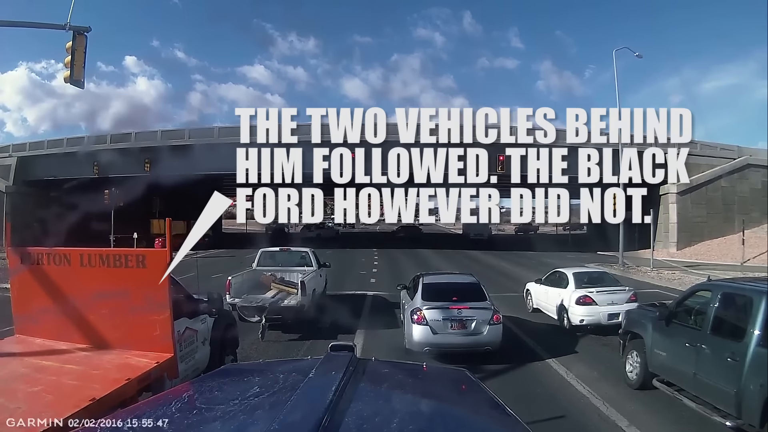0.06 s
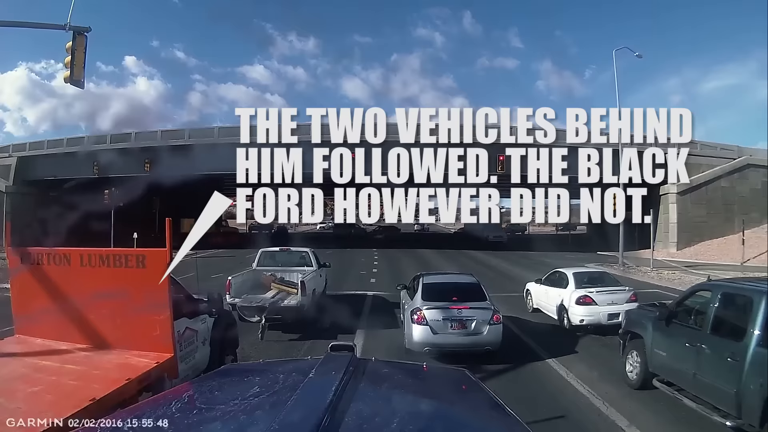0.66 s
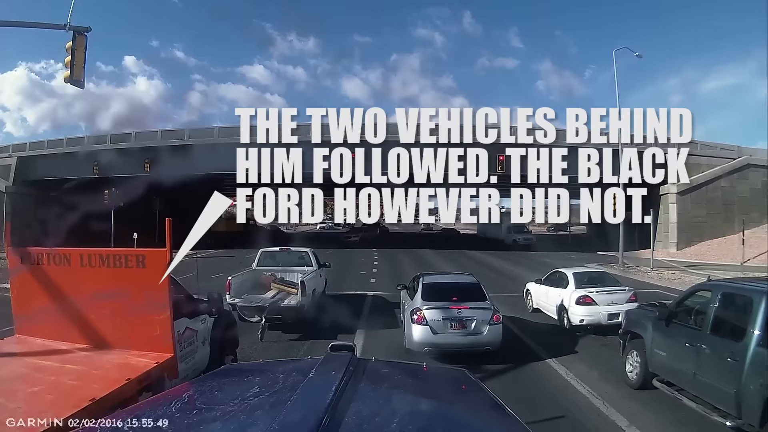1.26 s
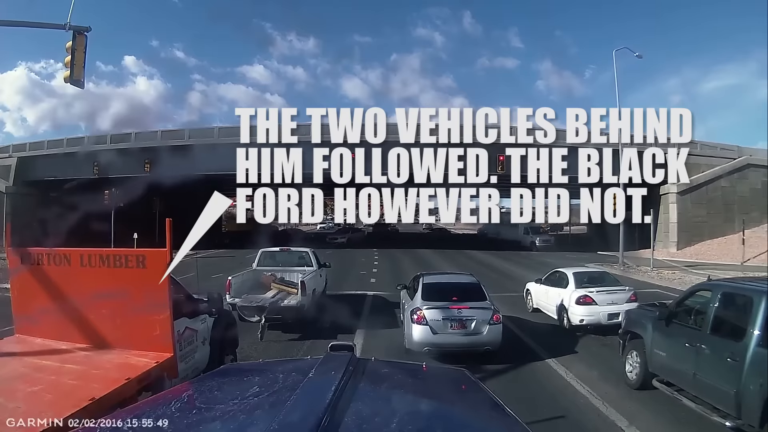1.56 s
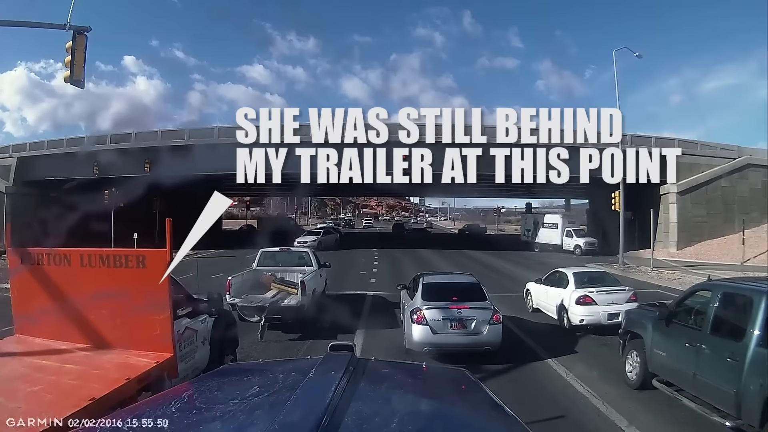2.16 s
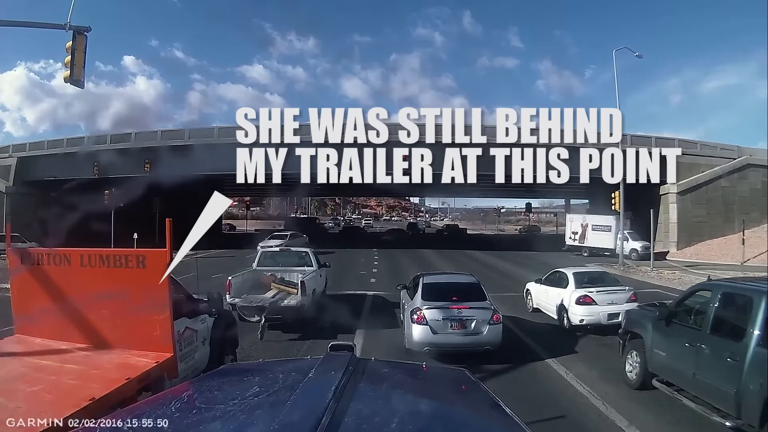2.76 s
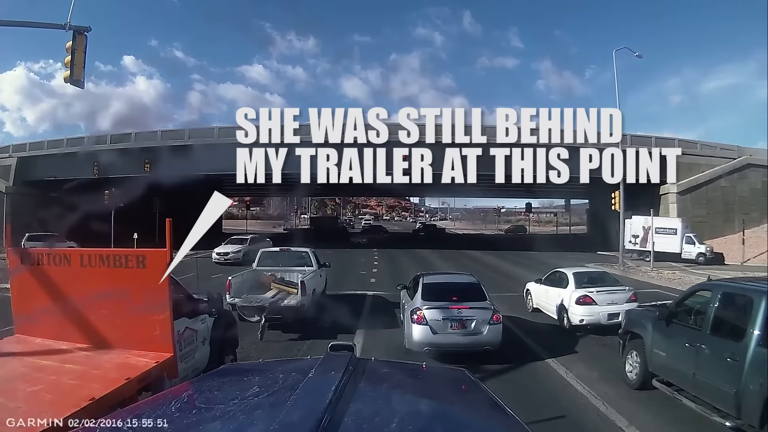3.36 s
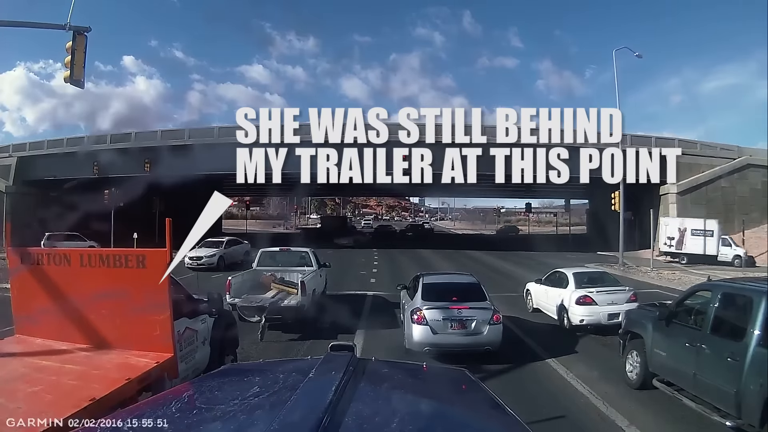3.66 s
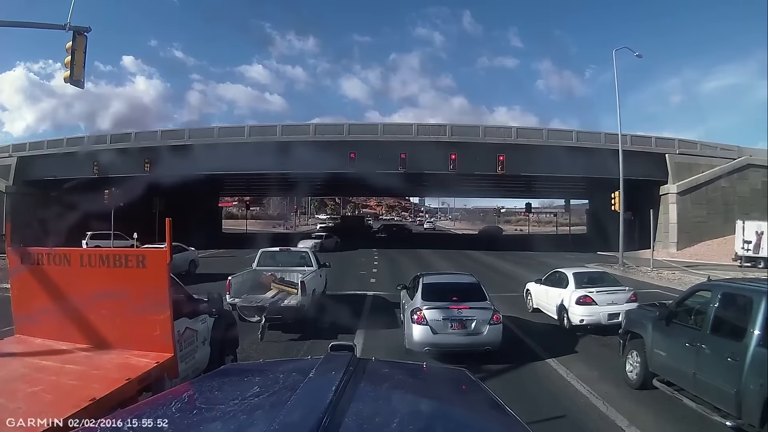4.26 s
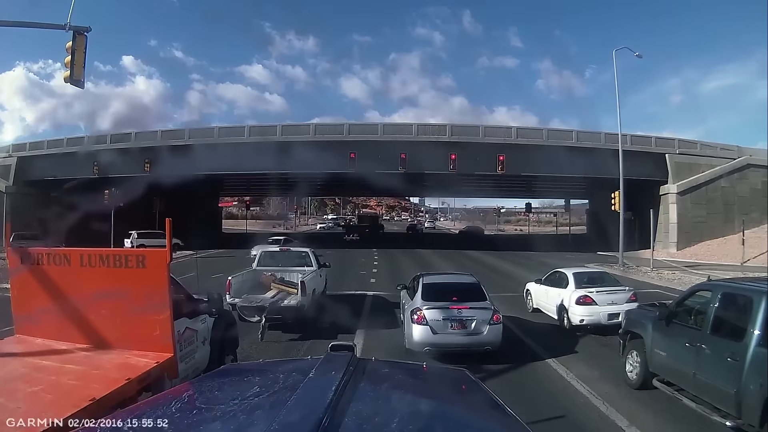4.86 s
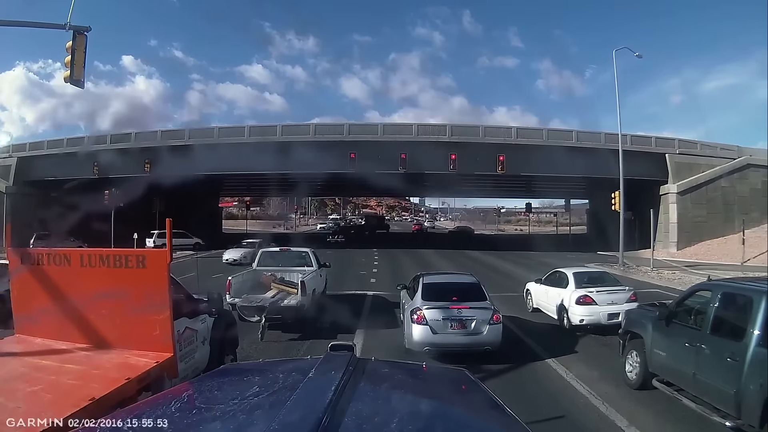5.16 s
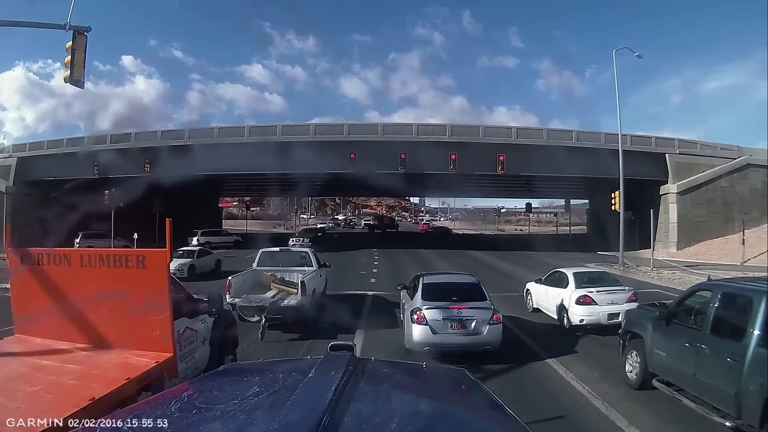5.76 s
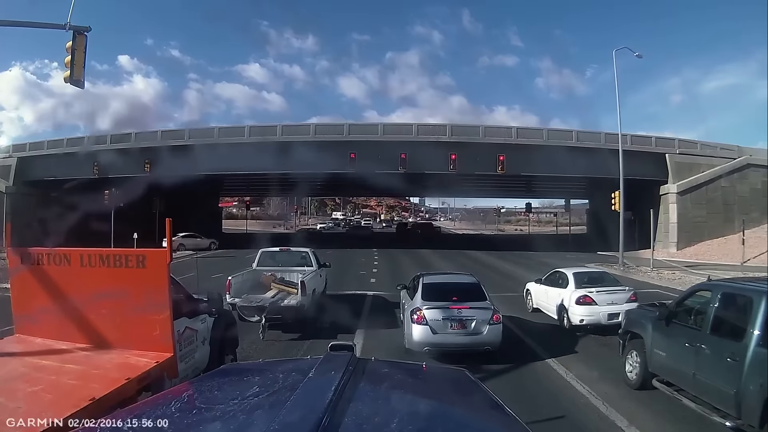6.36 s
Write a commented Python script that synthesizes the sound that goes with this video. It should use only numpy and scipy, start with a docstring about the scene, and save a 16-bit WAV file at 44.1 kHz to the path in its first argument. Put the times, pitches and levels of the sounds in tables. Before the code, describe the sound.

A large diesel truck engine idles from the very start, heard from inside the closed cab. Its deep, fast throb holds a constant speed with a slight lope, and the cab booms softly with it. Engine clatter comes through dulled by the panels, with a soft pulsing, flickering hiss and very faint, brief metallic ticks scattered throughout. At about 0.3 to 0.7 seconds the low boom swells, followed by a weaker swell ending around 1 second. From about 3.5 seconds a faint, wavering mid-pitched hum comes and goes behind the engine. Between roughly 3.8 and 4.8 seconds a few very faint, thin, high tones flicker in short bursts. The idle carries on unchanged until about 6.2 seconds, when all sound cuts out abruptly, leaving near silence for the last moment.

```python
"""Idling diesel truck, heard in the cab

A six-cylinder diesel idles at 700 rpm. Its firings throb through the floor, unequal cylinders make it
lope, and the air of the closed cab booms in resonance. Combustion clatter comes dulled through the
panels, its treble flaring briefly, and soft noise near 3 kHz pulses and flickers. A faint hum and thin
high tones come and go; near the end the sound cuts out."""
import sys
import numpy as np
from scipy import signal
from scipy.fft import rfft, irfft, next_fast_len
from scipy.io import wavfile

SR = 44100
rng = np.random.default_rng(int(sys.argv[2]) if len(sys.argv) > 2 else 0)


def to_wav(s):
    """Save 16-bit WAV."""
    ch = np.atleast_2d(s).T  # columns
    pcm = np.round(np.clip(ch, -1, 1) * 32767)  # PCM
    wavfile.write(sys.argv[1], SR, pcm.astype(np.int16))


N = 287091
T = np.arange(N) / SR
FIRING_HZ, CYLINDERS = 35.003, 6
FLARE_EDGE_S = .008
# treble flares of the clatter: t/s, duration/s, top f/Hz, spectrum level/dB before colouring
FLARES = [(0.231, 0.048, 5100, -100.0), (0.494, 0.041, 5500, -99.0), (0.728, 0.044, 5000, -100.0),
          (0.837, 0.023, 4200, -103.0), (0.899, 0.033, 5000, -102.0), (1.02, 0.029, 4600, -102.0),
          (1.093, 0.022, 4400, -98.0), (1.175, 0.025, 4600, -101.0), (1.262, 0.022, 5700, -103.0),
          (1.432, 0.022, 5100, -103.0), (1.601, 0.016, 3800, -97.0), (1.684, 0.049, 5700, -103.0),
          (1.794, 0.025, 5100, -101.0), (1.841, 0.031, 3800, -96.0), (1.945, 0.09, 5100, -102.0),
          (2.112, 0.018, 3700, -97.0), (2.244, 0.067, 4500, -101.0), (2.327, 0.043, 5600, -102.0),
          (2.458, 0.065, 4900, -101.0), (2.63, 0.02, 5100, -102.0), (2.694, 0.021, 5600, -102.0),
          (2.799, 0.023, 5100, -101.0), (2.969, 0.022, 4600, -100.0), (3.055, 0.019, 4100, -96.0),
          (3.146, 0.039, 5500, -100.0), (3.226, 0.019, 3800, -96.0), (3.311, 0.023, 5100, -102.0),
          (3.653, 0.066, 4600, -99.0), (3.844, 0.046, 5000, -100.0), (4.035, 0.023, 4600, -98.0),
          (4.126, 0.059, 5000, -100.0), (4.228, 0.023, 4600, -99.0), (4.356, 0.017, 5100, -101.0),
          (4.396, 0.028, 3800, -94.0), (4.438, 0.033, 5600, -102.0), (4.524, 0.041, 4500, -98.0),
          (4.738, 0.026, 5500, -100.0), (4.911, 0.023, 5000, -98.0), (5.037, 0.043, 4200, -100.0),
          (5.381, 0.047, 4600, -100.0), (5.546, 0.045, 5100, -100.0), (5.721, 0.023, 5000, -100.0),
          (5.894, 0.02, 5500, -99.0), (6.081, 0.026, 4200, -96.0)]


def crank(first_firing_s, wander):
    """Phase of a governed rotation, counted in firings: the speed is almost constant."""
    return FIRING_HZ * (T - first_firing_s) + wander * drift(0.86)


def throb(firings, flutter_db):
    """Periodic pressure pulses form a harmonic series; the cab's resonant phase lag spreads each pulse."""
    # harmonics: multiple of the firing rate, rms level/dB
    harmonics = [(1, -25.4), (2, -25.7), (3, -33.8), (4, -36.2), (5, -44.3), (6, -58), (7, -63), (11, -58),
                 (12, -58), (14, -61), (15, -59.5), (18, -68)]
    # air modes of the cab: f/Hz, bandwidth/Hz
    air_modes = [(82, 11.5), (134, 6)]
    out = 0
    for k, db in harmonics:
        hz = k * FIRING_HZ
        lag = sum(2 * np.arctan2(width * hz, centre ** 2 - hz ** 2) for centre, width in air_modes)
        out += from_db(db) * np.cos(2 * np.pi * k * firings - lag)
    return np.sqrt(2) * out * from_db(flutter_db * drift(4.7))


def lope(firings, odd_place=-.17, smear_firings=.07):
    """Half-order vibration: one odd cylinder jolts the block on its mounts every second crank turn."""
    # harmonics: multiple of the four-stroke cycle rate, rms level/dB
    harmonics = [(2, -39), (3, -41), (4, -45), (7, -34), (8, -48), (9, -38), (10, -50), (13, -47),
                 (15, -45.5), (19, -43), (20, -45.5), (21, -47), (22, -53), (26, -54), (27, -54), (29, -52),
                 (31, -55), (32, -55), (33, -56), (45, -57)]
    cycles = (firings - odd_place) / CYLINDERS
    out = 0
    for k, db in harmonics:
        smear = rng.normal(0, smear_firings) / CYLINDERS
        out += from_db(db) * np.cos(2 * np.pi * k * (cycles + smear))
    return np.sqrt(2) * out


def boom(firings, pump):
    """Forced resonance: random shaking, swelling with each firing, drives the air of the cab."""
    # boom of the cab air: f/Hz, spectrum level/dB
    spectrum = [(7, -78), (18, -58), (29, -61), (44, -56), (53, -49.5), (62, -47), (73, -51.5),
                (100, -54.5), (130, -56.5), (185, -60), (215, -67), (245, -80), (400, -90)]
    shake = rng.standard_normal(N) * (1 + pump * np.cos(2 * np.pi * firings))
    return coloured(rms_one(shake), spectrum)


def swells(waver_hz):
    """The cab air swells into a deep tone that rises and dies under a half-sine envelope."""
    # deep booms: t/s, duration/s, f/Hz, peak level/dB
    booms = [(0.336, 0.33, 62.7, -20.5), (0.69, 0.31, 59, -27)]
    out = 0
    for start, length, hz, db in booms:
        envelope = np.sin(np.pi * np.clip((T - start) / length, 0, 1))
        phase = 2 * np.pi * np.cumsum(hz + waver_hz * drift(7.5)) / SR
        out += from_db(db) * envelope * np.sin(phase)
    return out


def knocks(firings, cylinder_db, alike, decay_s, steady, rise_s=0.0051):
    """Impulsive excitation: each firing adds an exponentially damped burst to a steady noise."""
    number = np.floor(firings).astype(int) + CYLINDERS
    age_s = firings % 1 / FIRING_HZ
    scatter_db = 1.5 * rng.standard_normal(number.max() + 1)   # no two burns are quite equal
    strength = from_db(cylinder_db[number % CYLINDERS] + scatter_db[number])
    burst = (1 - np.exp(-age_s / rise_s)) * np.exp(-age_s / decay_s)
    cycle_size = round(SR * CYLINDERS / FIRING_HZ)
    recurring = rng.standard_normal(cycle_size)[np.arange(N) % cycle_size]   # each cylinder's own grain
    grain = np.sqrt(alike) * recurring + np.sqrt(1 - alike) * rng.standard_normal(N)
    return rms_one(grain * (steady + strength * burst))


def clatter(firings, split_hz):
    """Transmission through panels: combustion thuds and rattle lose treble and excite resonances."""
    # cylinders in firing order: relative thud level/dB, relative rattle level/dB
    cylinders = [(-1, -1), (6, 1), (-2, 0), (5, 2), (2, 0), (-4, -1)]
    # clatter behind the bulkhead: f/Hz, spectrum level/dB
    spectrum = [(120, -59), (230, -65.5), (370, -68), (600, -75), (850, -79), (1400, -84), (2000, -87.5),
                (2300, -92), (2600, -102), (3100, -115), (3400, -128)]
    # panel resonances: f/Hz, bandwidth/Hz, lift/dB
    panels = [(295, 30, 2.5), (345, 30, 2), (400, 50, 3.5), (485, 30, 2.5), (520, 25, 3), (615, 30, 2.5),
              (684, 32, 2.5), (830, 30, 1.5), (1025, 60, 5.5), (1305, 65, 4.5), (1440, 30, 2),
              (1653, 40, 3), (1866, 20, 2.5), (1962, 60, 2.5), (2270, 40, 3)]
    thud_db, rattle_db = np.transpose(cylinders)
    thuds = knocks(firings, thud_db, alike=0.32, decay_s=0.007, steady=0.93)
    rattle = knocks(firings, rattle_db, alike=0.17, decay_s=0.068, steady=0.49)
    low = signal.sosfilt(signal.butter(2, split_hz, "low", fs=SR, output="sos"), thuds)
    high = signal.sosfilt(signal.butter(2, split_hz, "high", fs=SR, output="sos"), rattle)
    return coloured(low + high, spectrum, panels)


def flares(ragged_db, low_hz=3400):
    """Resonant filtering gives short, ragged bursts of treble noise a metallic edge."""
    # spectral tilt: f/Hz, gain/dB
    tilt = [(3400, 3), (4200, -4), (5700, -2)]
    # metallic resonances: f/Hz, bandwidth/Hz, lift/dB
    ring = [(4080, 120, 6), (4560, 100, 5), (4950, 140, 6), (5500, 120, 5)]
    bursts = np.zeros(N)
    for start, length, top_hz, db in FLARES:
        level = gate(start - FLARE_EDGE_S / 2, length + FLARE_EDGE_S, FLARE_EDGE_S)
        live = level > 0
        bursts[live] += from_db(db) * level[live] * noise_band(low_hz, top_hz, order=12, size=live.sum())
    ragged = rms_one(from_db(ragged_db * drift(98)))
    return coloured(bursts * ragged / np.sqrt(SR / 2), tilt, ring)


def treble_flicker(firings, spectrum, lope_share, on_bias, pulse_depth):
    """Amplitude modulation: a soft band of treble noise near 3 kHz pulses and flickers on and off."""
    sway = lope_share * np.cos(2 * np.pi * (firings - 1.5) / CYLINDERS)
    flicker = (1 + np.tanh(5 * (drift(20) + sway + on_bias))) / 2
    flaring = sum(gate(start - FLARE_EDGE_S, length + 2 * FLARE_EDGE_S, FLARE_EDGE_S)
                  for start, length, _, _ in FLARES)
    level = np.maximum(flicker, flaring) * (1 + pulse_depth * np.sin(2 * np.pi * firings))
    return coloured(rms_one(level * rng.standard_normal(N)), spectrum)


def hum(hz, width_hz):
    """Narrow-band noise is heard as a wavering hum that comes and goes behind the engine."""
    # course of the hum: t/s, rms level/dB
    levels = [(0, -70.5), (3.0, -68), (3.5, -54.5), (3.9, -61.5), (4.3, -55), (4.65, -67.5), (5.0, -54),
              (5.4, -59.5), (6.2, -62)]
    band = rms_one(noise_band(hz - width_hz / 2, hz + width_hz / 2, order=2))
    return from_db(np.interp(T, *np.transpose(levels))) * band


def whistles(waver_hz, grit_db, grit_width_hz=750):
    """Random frequency and amplitude modulation make thin tones flicker, each in a band of grit."""
    # high tones: t/s, duration/s, f/Hz, grit centre f/Hz, peak level/dB before flutter
    tones = [(3.834, 0.105, 10647, 10900, -68), (4.027, 0.038, 10647, 10900, -68),
             (4.39, 0.04, 10750, 10900, -67), (4.434, 0.11, 10647, 10900, -66),
             (4.535, 0.065, 10647, 10900, -63.5), (4.564, 0.036, 13360, 13150, -71),
             (4.667, 0.038, 10700, 10900, -68), (4.732, 0.035, 10647, 10900, -68)]
    waver = waver_hz * drift(120)
    flutter = from_db(2 * drift(25))
    out = 0
    for start, length, hz, grit_hz, db in tones:
        tone = flutter * np.sin(2 * np.pi * np.cumsum(hz + waver) / SR)
        grit = rms_one(noise_band(grit_hz - grit_width_hz / 2, grit_hz + grit_width_hz / 2))
        out += from_db(db) * gate(start, length, edge_s=.01) * (tone + from_db(grit_db) * grit)
    return out


def from_db(db):
    """Amplitude ratio of a level in decibels."""
    return 10 ** (np.asarray(db) / 20)


def rms_one(x):
    """Normalisation to unit rms."""
    return x / np.sqrt(np.mean(x ** 2))


def drift(rate_hz):
    """Low-pass random fluctuation of unit rms."""
    hz = np.fft.rfftfreq(N, 1 / SR)
    return rms_one(irfft(rfft(rng.standard_normal(N)) / (1 + (hz / rate_hz) ** 2), N))


def gate(start, length, edge_s):
    """Trapezoidal envelope of one short event."""
    return np.clip(np.minimum(T - start, start + length - T) / edge_s, 0, 1)


def noise_band(low_hz, high_hz, order=6, size=N):
    """Band-pass noise at a spectrum level of 0 dB (power in 1 Hz)."""
    band = signal.butter(order, [low_hz, high_hz], "band", fs=SR, output="sos")
    return signal.sosfilt(band, rng.standard_normal(size)) * np.sqrt(SR / 2)


def coloured(white, spectrum, resonances=()):
    """Spectral shaping: unit white noise takes on given spectrum levels, plus resonance peaks."""
    size = next_fast_len(N)
    hz = np.maximum(np.fft.rfftfreq(size, 1 / SR), 1)
    points_hz, points_db = np.transpose(spectrum)
    db = np.interp(np.log(hz), np.log(points_hz), points_db)
    db -= 30 * np.log2(np.maximum(hz / points_hz[-1], 1))   # 30 dB an octave above the last point
    for centre, width, lift in resonances:
        db += lift / (1 + (2 * (hz - centre) / width) ** 2)
    return irfft(rfft(white, size) * from_db(db) * np.sqrt(SR / 2), size)[:N]


def scene():
    """Superposition of the engine, timed by one crankshaft, with the faint hum and high tones."""
    # lower band of flickering treble noise: f/Hz, spectrum level/dB
    lower_band = [(2150, -110), (2350, -95.5), (2600, -92.5), (2820, -99), (2950, -120)]
    # upper band of flickering treble noise: f/Hz, spectrum level/dB
    upper_band = [(2750, -118), (2900, -99), (3070, -92.5), (3300, -98.5), (3430, -103), (3560, -126)]
    firings = crank(first_firing_s=.0416, wander=.011)
    block = throb(firings, flutter_db=.35) + lope(firings)
    cab_air = boom(firings, pump=0.062) + swells(waver_hz=1.33)
    metal = clatter(firings, split_hz=1250) + flares(ragged_db=2.0)
    treble = treble_flicker(firings, lower_band, lope_share=0.51, on_bias=0.47, pulse_depth=0.18)
    treble += treble_flicker(firings, upper_band, lope_share=.4, on_bias=0.04, pulse_depth=0.23)
    background = whistles(waver_hz=22, grit_db=-7) + hum(hz=690.5, width_hz=35)
    return (block + cab_air + metal + treble + background)[None]


def record(dry, cut_out_s=6.235, cutoff_hz=15500):
    """Gating and band limiting: the sound cuts out to a trace of hiss, and the top treble is removed."""
    live = np.clip((cut_out_s - T) / .002, 0, 1)
    hiss = from_db(-102) * rng.standard_normal(N)
    low_pass = signal.cheby2(12, 70, cutoff_hz, fs=SR, output="sos")
    return signal.sosfilt(low_pass, dry * live + hiss)


dry = scene()
out = record(dry)
to_wav(out)
```